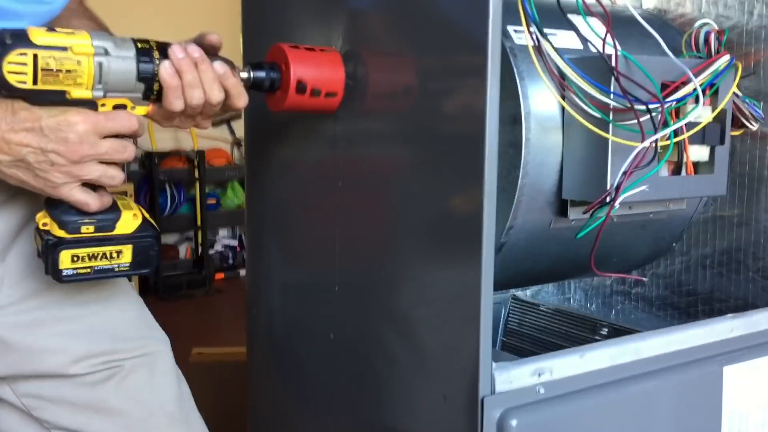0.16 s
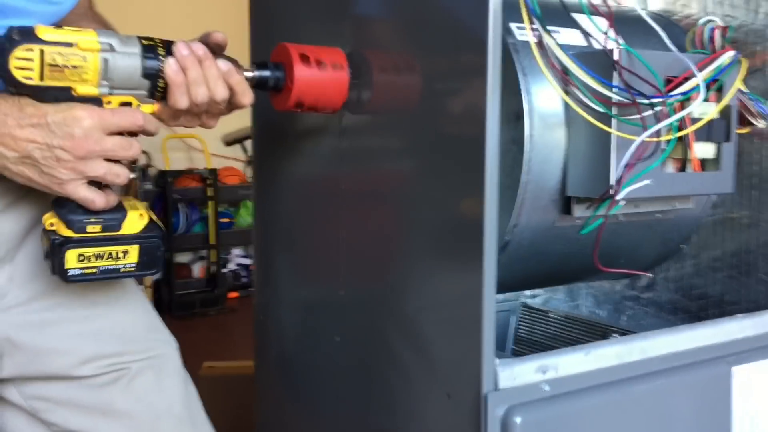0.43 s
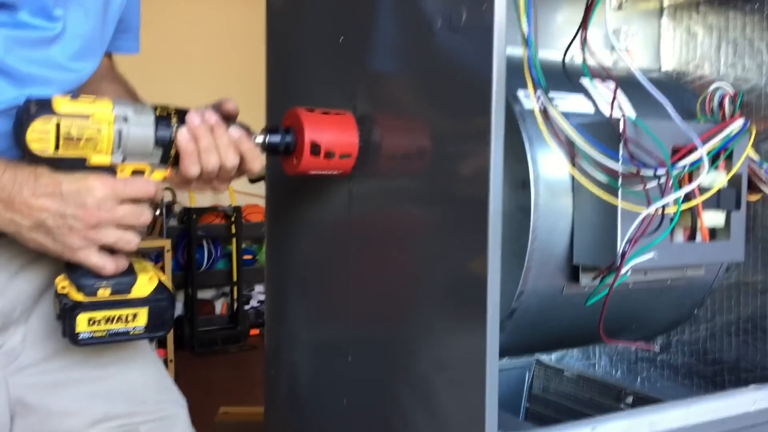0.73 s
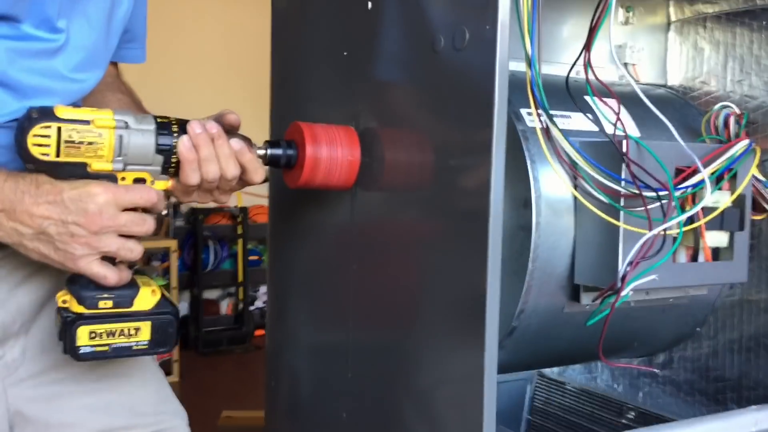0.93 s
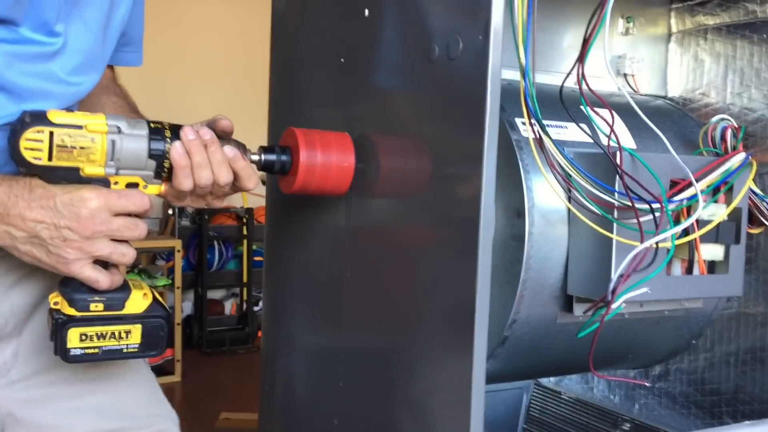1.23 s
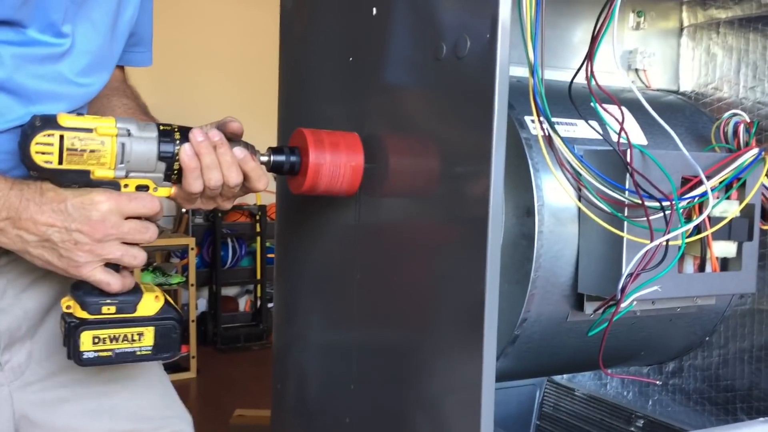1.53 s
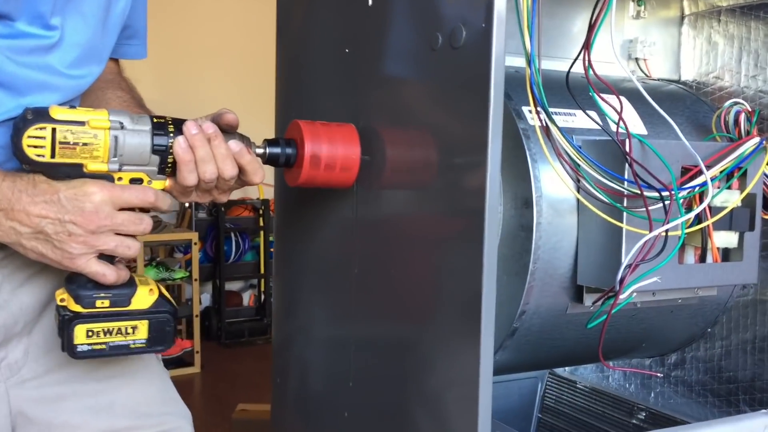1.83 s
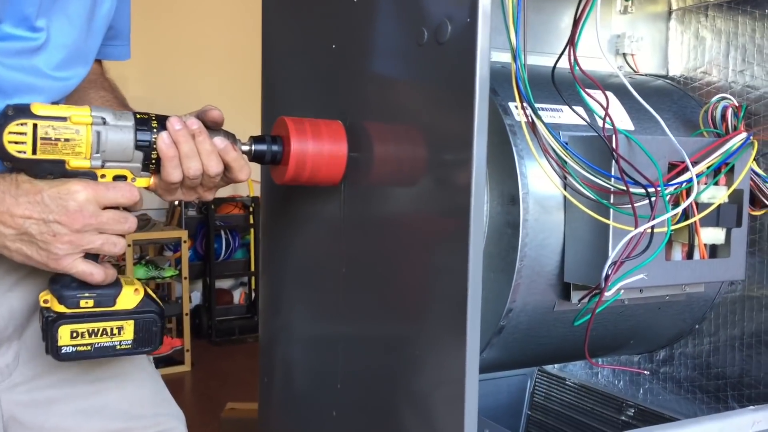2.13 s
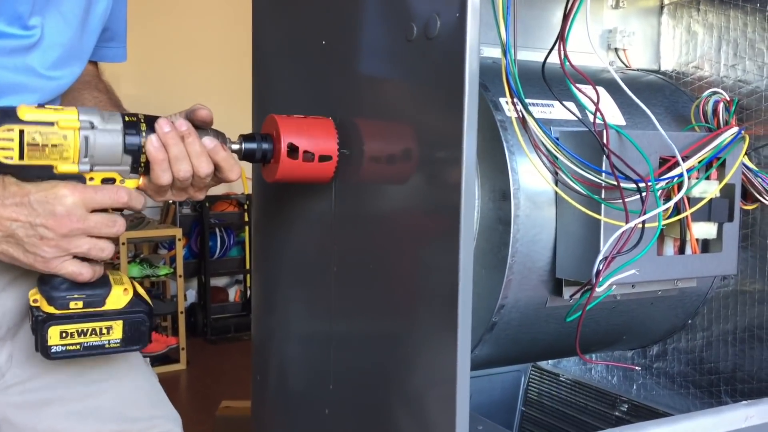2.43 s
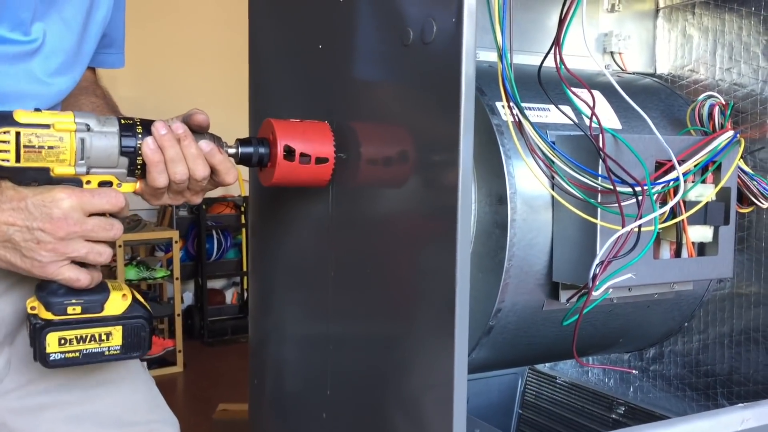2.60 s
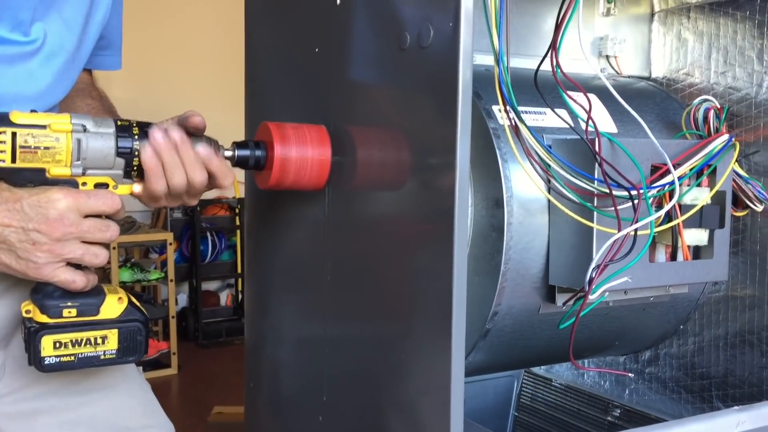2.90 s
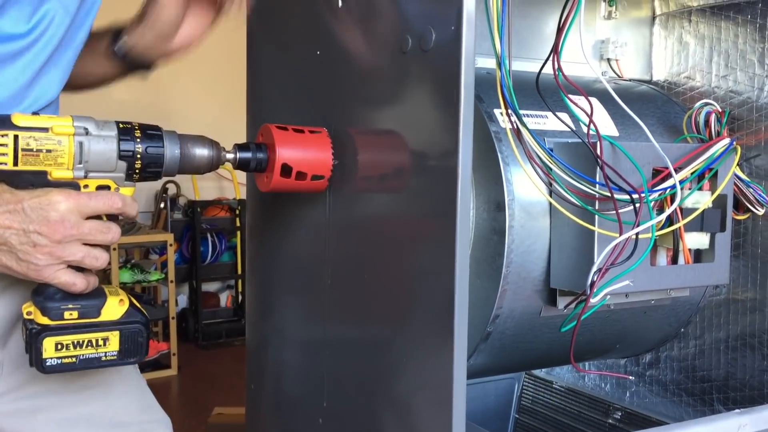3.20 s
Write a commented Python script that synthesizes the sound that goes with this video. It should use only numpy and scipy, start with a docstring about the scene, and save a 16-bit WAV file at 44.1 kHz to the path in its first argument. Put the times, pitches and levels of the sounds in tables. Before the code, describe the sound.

A cordless drill with a hole saw clicks and creeps, then revs in six short bursts. Each gear whine rises and stops with a sharp ratcheting clack, heard close in a hard-walled utility room over a low rumble.

```python
"""Over a low rumble and the dying ring of a hard-walled utility room, a cordless drill creeps and clicks.
Its hole saw is then blipped six times at a sheet-metal cabinet; the second pull also follows a creep.
On each pull the slack closes with a click, meshing gears whine upwards over the rush of the motor, and
the brake stops the spindle with a knock and a ratcheting clatter. Once the cabinet booms in its low
panel modes. The room answers the drill with near echoes and a diffuse tail."""
import sys
import numpy as np
from scipy import signal
from scipy.fft import rfft, irfft
from scipy.io import wavfile

SR = 44100
rng = np.random.default_rng(int(sys.argv[2]) if len(sys.argv) > 2 else 0)


def wrap_up_sound(samples):
    """Save the sound to the file named by the first command line argument, as 16-bit audio."""
    columns = np.atleast_2d(samples).T
    # keep every value between -1 and 1, then stretch to whole-number steps
    tamed = np.clip(columns, -1, 1)
    steps = np.round(tamed * 32767).astype(np.int16)
    wavfile.write(sys.argv[1], SR, steps)


N = 147735
TIME = np.arange(N) / SR

# Spectral envelopes, shape only: f/Hz, level/dB
RUMBLE_SPECTRUM = [(20, -66), (40, -37), (65, 2), (100, 3.5), (150, -23.5), (400, -13), (1500, -18),
                   (4000, -8), (15000, -40)]
GRIND_SPECTRUM = [(100, -15.5), (300, -7.5), (500, 0.5), (750, -5), (1400, 6), (2100, -0.5), (4000, -0.5),
                  (5200, -6.5), (9500, -10.5), (15500, -13.5)]
CLICK_SPECTRUM = [(88, -54), (150, -24), (457, -13.5), (689, -20), (854, -10), (1190, -1), (1980, -5),
                  (2450, 0), (3220, -4), (3490, -8), (4160, -2), (4950, -12), (5360, -7), (7470, -15.5),
                  (9630, -13), (10400, -18), (11500, -9.5), (15100, -13.5), (16000, -28)]
RUSH_SPECTRUM = [(60, -34), (200, -14.5), (450, -11), (800, -8), (1150, -4), (1500, 4.5), (2000, -1.5),
                 (2800, 0.5), (3500, 1), (4200, 1), (5000, -13), (7000, -9.5), (16000, -23)]
BRUSH_SPECTRUM = [(2650, -29.5), (4500, 1), (5060, -5.5), (5930, -1.5), (6590, -8), (7220, -8), (7650, -17),
                  (9210, 0), (9660, -3.5), (10200, -10), (11500, -2), (13900, -7), (15100, -4.5),
                  (16000, -13)]
KNOCK_SPECTRUM = [(150, -10.5), (600, -13), (1000, 7), (1600, 3.5), (1900, -11), (2250, -1), (2800, 2),
                  (3600, -2), (4800, -17), (8000, -30), (16000, -30)]
LOCK_SPECTRUM = [(59, -11), (100, -27), (249, -21.5), (513, -8.5), (768, -10), (1170, -2.5), (1580, 1),
                 (2000, -3.5), (2520, 1), (2930, -4), (3250, -1.5), (3860, -1.5), (4290, -1.5),
                 (5080, -7.5), (6290, -6.5), (6840, -5), (7770, -11), (9210, -6.5), (10200, -13),
                 (12100, -6), (14400, -7.5), (16000, -18.5)]
SHUDDER_SPECTRUM = [(50, -20), (100, -0.5), (200, -1.5), (330, -7.5), (450, -18), (600, -15.5), (900, -31),
                    (2000, -55)]

# Half-pressed trigger: start t/s, end t/s, grind level/dB, whistle level/dB, final gear f/Hz
HALF_PULLS = [(0.098, 0.182, -33.5, -50, 516.2), (0.214, 0.239, -29, -36, 297.7),
              (0.286, 0.368, -36, -60, 455.8), (0.671, 0.772, -33, -52, 540),
              (0.798, 0.926, -35.5, -60, 475.2), (2.695, 2.73, -32, -60, 395.8)]
# Slack closing in chuck and gears: t/s, level/dB, decay t/s
SLACK_CLICKS = [(.1035, -14, 0.0079), (.202, -14.5, 0.0048), (.219, -23, 0.0054), (.2595, -21, 0.0039),
                (.2715, -18.5, 0.0011), (.2875, -12, 0.0038), (.6765, -14, 0.0037), (.7845, -18.5, 0.0084),
                (.835, -30.5, .003), (.852, -22, 0.0043), (.874, -28, 0.0022), (1.1888, 3.5, 0.002),
                (1.571, -2, 0.0029), (1.586, -19, 0.0035), (2.1353, -2, 0.0026), (2.6935, -13.5, 0.0041),
                (2.701, -16.5, .003), (2.7145, -21, .003)]
# Modes of the steel saw cup: f/Hz, level/dB, T60/s
CUP_MODES = [(6430, -60, .2), (8300, -52, .16), (10470, -59, .14)]
# Full trigger pulls: start t/s, lock t/s, first gear f/Hz, limiting gear f/Hz, spin-up constant t/s
PULLS = [(.288, .498, 344, 1555, .088), (.875, 1.0556, 588, 1540, .108), (1.189, 1.4318, 575, 1555, .104),
         (1.571, 1.9112, 722, 1690, .148), (2.135, 2.4898, 646, 1675, .15),
         (2.693, 3.0617, 590, 1700, .135)]
# Relative strength of each pull: rush level/dB, brake knock level/dB, clatter level/dB
PULL_LEVELS = [(0.5, -14, -1), (1, -14.5, -2.5), (-1, -13, -1), (0, -14.5, -1), (0, -9, -2),
               (0.5, -10, -0.5)]
# Gear whine ahead of the housing: harmonic number, level/dB
MESH_HARMONICS = [(1, -33.5), (2, -32), (3, -35), (4, -40.5), (5, -46)]
# Response of the housing to the whine: f/Hz, level/dB
HOUSING_RESPONSE = [(300, -19), (500, -14), (800, -14), (1100, -10), (1350, -4), (1600, 1), (2100, -2),
                    (2450, -5), (3000, -1), (3500, -3), (4050, 0), (4500, -7), (5000, -13), (8000, -18)]
# Contacts of the spindle lock at each stop: delay t/s, relative level/dB, decay t/s
LOCK_CONTACTS = [(0, -1, .0028), (.0092, -2, 0.0017), (0.0134, -3, .003), (0.0164, -1, 0.0028)]
# Soft bumps on the cabinet: t/s, level/dB
PANEL_BUMPS = [(2.12, -4), (2.129, 0.5), (2.138, 2.5), (2.149, -21)]
# Modes of the cabinet panel: f/Hz, level/dB, T60/s
CABINET_MODES = [(73, -33, 0.39), (97, -29.5, 0.55), (108.3, -24.5, 0.46), (127, -31, .3),
                 (169.3, -23, 0.28), (214.2, -31.5, .3), (304, -26, 0.25), (347, -28, 0.13)]
# Reflections from near surfaces: delay t/s, level/dB
NEAR_ECHOES = [(.0041, -23), (.0068, -21.5), (0.0121, -14)]
# Diffuse tail of the room: f/Hz, T60/s, level/dB
ROOM_TAIL = [(102, 0.85, 10.5), (510, 0.44, -8.5), (1500, 0.77, -10.5), (4000, 0.76, -13),
             (7800, 0.68, -11), (15000, 0.59, -19.5)]

LINGER_DB, LINGER_T60_S, RUMBLE_DB = -35.5, 0.93, -44.5
WHISTLE_HZ, GROWL_DB = 5660, -10   # growl relative to the grind
STRIKE_ATTACK_S, CRACK_DB = 0.00076, 11.5   # crack relative to the rattle after it
FULL_SPEED_HZ, TEETH_PER_TURN = 1600, 7.4
RUSH_DB, BRUSH_DB, UNBALANCE_DB = -30.5, -31, -51   # base levels at full speed
PITCH_WOBBLE, WHINE_FLUTTER, RUSH_FLUTTER, FLUTTER_HZ = .005, .55, 0.2, 110
KNOCK_LEAD_S, KNOCK_DECAY_S = 0.01295, 0.0037   # the brake bites just before the lock
SHUDDER_DB, SHUDDER_RISE_S, SHUDDER_DECAY_S = -18, 0.013, 0.057


def from_db(db):
    return 10 ** (np.asarray(db) / 20)


def at_hz(points, hz, column=1):
    """Interpolation of a table column on a log-frequency axis."""
    table = np.array(points)
    return np.interp(np.log(np.maximum(hz, 1)), np.log(table[:, 0]), table[:, column])


def coloured(x, spectrum, size=8192):
    """Minimum-phase filtering to a spectral envelope; white noise keeps its power."""
    cepstrum = irfft(np.log(from_db(at_hz(spectrum, np.fft.rfftfreq(size, 1 / SR)))))
    cepstrum[1:size // 2] *= 2
    cepstrum[size // 2 + 1:] = 0
    response = irfft(np.exp(rfft(cepstrum)))
    return signal.fftconvolve(x, response / np.linalg.norm(response))[:N]


def noise(spectrum):
    return coloured(rng.standard_normal(N), spectrum)


def drift(hz):
    """Random modulation: low-passed noise of unit RMS."""
    slow = signal.sosfilt(signal.butter(2, hz, fs=SR, output="sos"), rng.standard_normal(N))
    return slow / np.sqrt(np.mean(slow ** 2) + 1e-20)


def gate(start, end, ramp_s=0.004):
    """Trapezoidal envelope between two times."""
    return np.clip((TIME - start) / ramp_s, 0, 1) * np.clip((end - TIME) / ramp_s, 0, 1)


def ring(force, modes):
    """Modal superposition: a unit impulse sets each damped resonator ringing at its level."""
    ringing = 0
    for hz, db, t60 in modes:
        radius, angle = from_db(-60 / (t60 * SR)), 2 * np.pi * hz / SR
        feedback = [1, -2 * radius * np.cos(angle), radius ** 2]
        ringing += from_db(db) * signal.lfilter([0, np.sin(angle)], feedback, force + 1e-18)
    return ringing


def background():
    """Reverberation still in the room at the start decays exponentially over a steady rumble."""
    fade = from_db(LINGER_DB - 60 * TIME / LINGER_T60_S)
    return fade * noise(GRIND_SPECTRUM) + from_db(RUMBLE_DB) * noise(RUMBLE_SPECTRUM)


def creeping_gears(first_share=.6):
    """Slow tooth contact grinds and growls upwards; the speed control excites a whistle in the windings."""
    grind_gain, whistle_gain, mesh_hz = np.zeros((3, N))
    for start, end, grind_db, whistle_db, final_hz in HALF_PULLS:
        on = gate(start, end)
        grind_gain += from_db(grind_db) * on
        whistle_gain += from_db(whistle_db) * on
        mesh_hz += (on > 0) * final_hz * np.interp(TIME, [start, end], [first_share, 1])
    phase = 2 * np.pi * np.cumsum(mesh_hz) / SR
    growl = from_db(GROWL_DB) * sum(np.sin(k * phase) for k in (1, 2, 3))
    grind = noise(GRIND_SPECTRUM) * (1 + .4 * drift(hz=160))
    return grind_gain * (grind + growl) + whistle_gain * np.sin(2 * np.pi * WHISTLE_HZ * TIME)


def strikes(contacts, size=2400):
    """Impact of steel on steel: an impulsive crack and a dense rattle that dies within milliseconds."""
    power, crack = np.zeros((2, N + size))
    age = np.arange(size) / SR
    attack = np.minimum(age / STRIKE_ATTACK_S, 1)
    for t, db, decay in contacts:
        onset = int(t * SR)
        power[onset:onset + size] += (from_db(db) * attack * np.exp(-age / decay)) ** 2
        crack[int((t + STRIKE_ATTACK_S) * SR)] += from_db(db + CRACK_DB)
    return np.sqrt(power[:N]) * rng.standard_normal(N) + crack[:N]


def backlash():
    """Slack in chuck and gears closes in impacts, which excite the modes of the saw cup."""
    clicks = strikes(SLACK_CLICKS)
    return coloured(clicks, CLICK_SPECTRUM) + ring(clicks, CUP_MODES)


def motor():
    """Periodic tooth meshing gives a harmonic whine; it, the rush and the brush hiss grow with speed."""
    mesh_hz, rush_gain, tone_gain = np.zeros((3, N))
    for (start, lock, first_hz, limit_hz, spin_up), (rush_db, _, _) in zip(PULLS, PULL_LEVELS):
        climb = 1 - np.exp(-np.maximum(TIME - start, 0) / spin_up)
        mesh_hz += (first_hz + (limit_hz - first_hz) * climb) * (TIME >= start) * (TIME < lock)
        rush_gain += from_db(rush_db) * gate(start, lock)
        tone_gain += gate(start, lock - KNOCK_LEAD_S)
    speed = mesh_hz / FULL_SPEED_HZ
    phase = 2 * np.pi * np.cumsum(mesh_hz * (1 + PITCH_WOBBLE * drift(FLUTTER_HZ / 2))) / SR
    whine = 0
    for k, db in MESH_HARMONICS:
        amplitude = from_db(db + at_hz(HOUSING_RESPONSE, k * mesh_hz))
        whine += amplitude * np.sin(k * phase) * (1 + WHINE_FLUTTER * drift(FLUTTER_HZ))
    rotor = np.sin(phase / TEETH_PER_TURN)   # unbalance: one cycle per turn
    tones = speed ** .15 * whine + from_db(UNBALANCE_DB) * speed ** 2 * rotor
    rush = from_db(RUSH_DB) * speed ** .23 * noise(RUSH_SPECTRUM)
    hiss = from_db(BRUSH_DB) * speed * noise(BRUSH_SPECTRUM)
    flutter = 1 + RUSH_FLUTTER * (rotor + drift(hz=350)) / 2
    return rush_gain * (rush + hiss) * flutter + tone_gain * tones


def brake():
    """The brake bites with one impact; repeated impacts of the spindle lock then ring the saw cup."""
    contacts, bites = [], []
    for (_, lock, *_), (_, knock_db, clatter_db) in zip(PULLS, PULL_LEVELS):
        contacts += [(lock + delay, clatter_db + db, decay) for delay, db, decay in LOCK_CONTACTS]
        bites.append((lock - KNOCK_LEAD_S, knock_db, KNOCK_DECAY_S))
    chatter = strikes(contacts)
    knocks = coloured(strikes(bites), KNOCK_SPECTRUM)
    return knocks + coloured(chatter, LOCK_SPECTRUM) + ring(chatter, CUP_MODES)


def cabinet(half_width_s=0.0015):
    """Soft triangular force pulses excite the panel's low modes and a dense, quickly damped shudder."""
    force = sum(from_db(db) * np.maximum(1 - np.abs((TIME - t) / half_width_s - 1), 0)
                for t, db in PANEL_BUMPS)
    boom = ring(force / (half_width_s * SR), CABINET_MODES)
    age = np.maximum(TIME - PANEL_BUMPS[0][0], 0)
    envelope = np.minimum(age / SHUDDER_RISE_S, 1) * np.exp(-age / SHUDDER_DECAY_S)
    return boom + from_db(SHUDDER_DB) * envelope * noise(SHUDDER_SPECTRUM)


def room(x, bands=12, build_s=0.004):
    """Reflection at hard walls: a few near echoes, then a diffuse tail with a decay time for each band."""
    age, hz = TIME[:SR], np.fft.rfftfreq(SR, 1 / SR)
    white, tail = rfft(rng.standard_normal(SR)), 0
    edges_hz = np.geomspace(60, 18000, bands + 1)
    for low, high in zip(edges_hz, edges_hz[1:]):
        centre = np.sqrt(low * high)
        t60, db = at_hz(ROOM_TAIL, centre), at_hz(ROOM_TAIL, centre, column=2)
        band = irfft(white * (hz >= low) * (hz < high), SR)
        fade = from_db(-60 * age / t60) * np.minimum(age / build_s, 1)
        tail += from_db(db) * band * fade / np.linalg.norm(fade)
    echoes = sum(from_db(db) * np.pad(x, (round(delay * SR), 0))[:N] for delay, db in NEAR_ECHOES)
    return echoes + signal.fftconvolve(x, tail)[:N]


def scene():
    """Superposition of background, drill, its reflections and cabinet, the same in both channels."""
    drill = creeping_gears() + backlash() + motor() + brake()
    mono = background() + drill + room(drill) + cabinet()
    return np.array([mono, mono])


def record(dry, overload=0.7, low_hz=46, high_hz=15900):
    """Clipping flattens the loudest clacks; band limiting cuts the deep bass and the top."""
    clipped = np.clip(dry, -overload, overload)
    thinned = signal.sosfilt(signal.butter(4, low_hz, "high", fs=SR, output="sos"), clipped)
    return signal.sosfilt(signal.ellip(10, .2, 70, high_hz, fs=SR, output="sos"), thinned)


dry = scene()
out = record(dry)
wrap_up_sound(out)
```